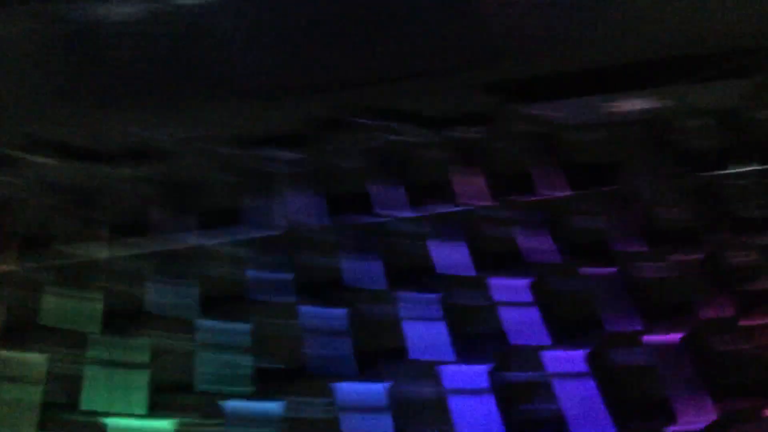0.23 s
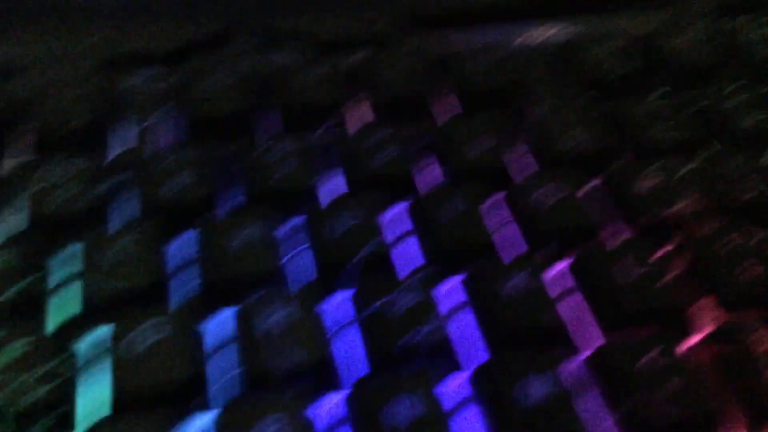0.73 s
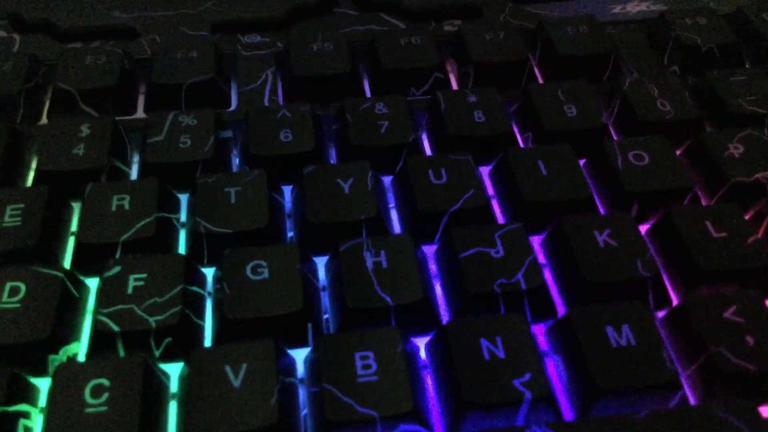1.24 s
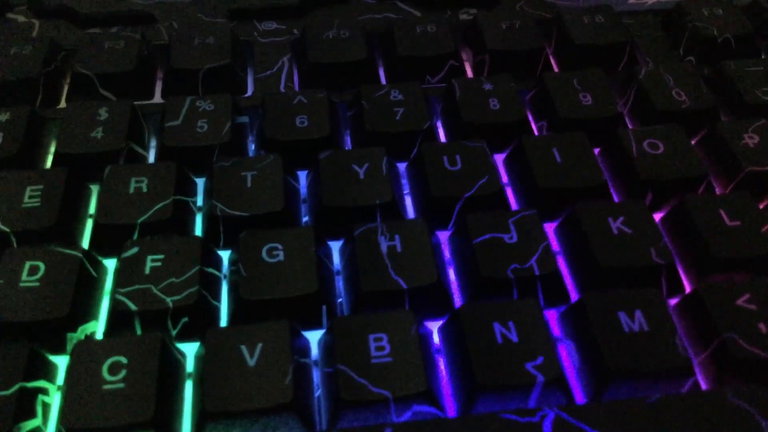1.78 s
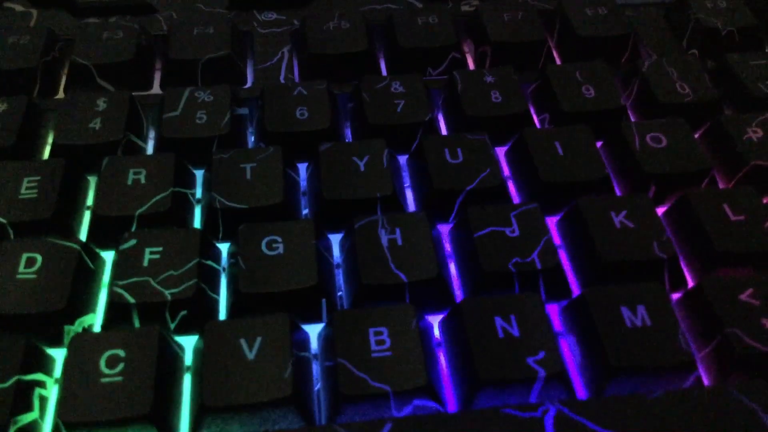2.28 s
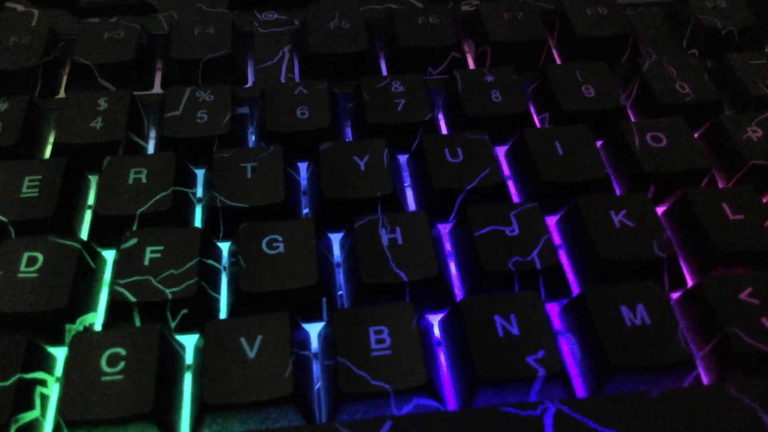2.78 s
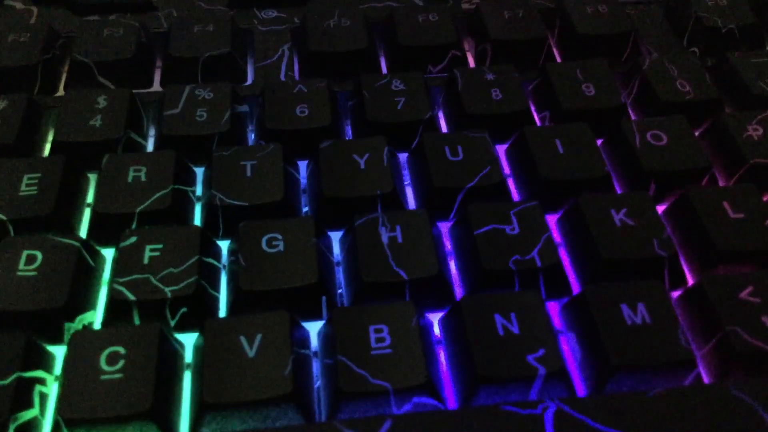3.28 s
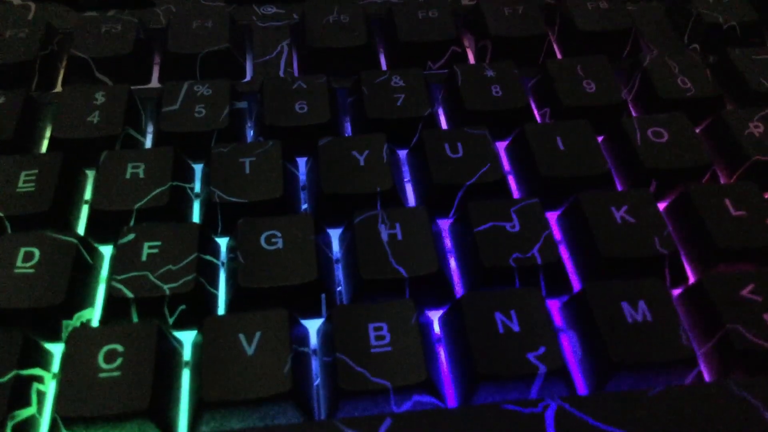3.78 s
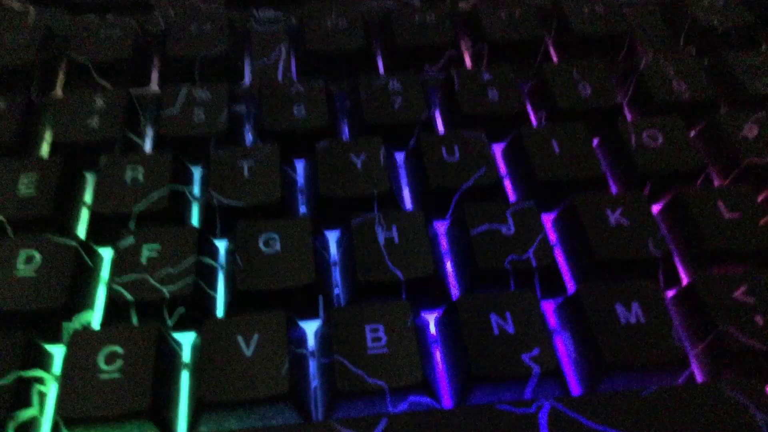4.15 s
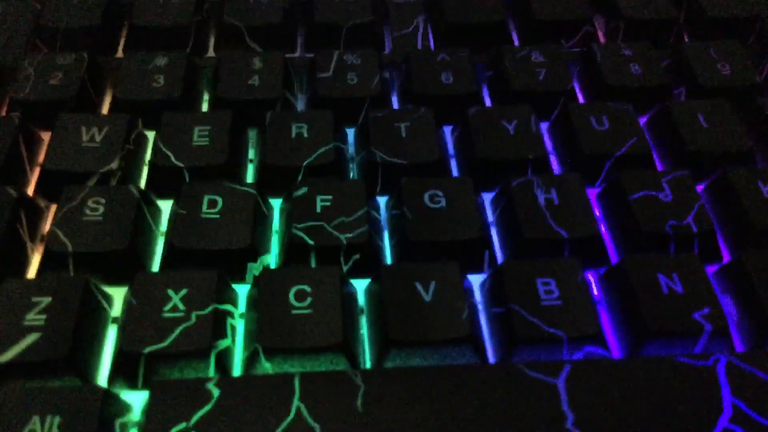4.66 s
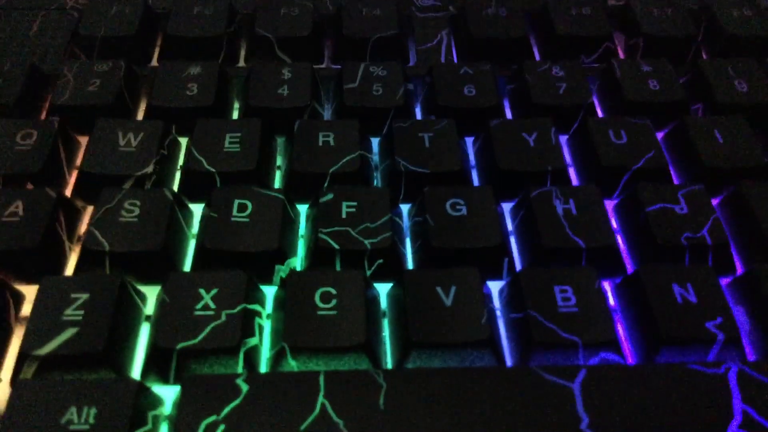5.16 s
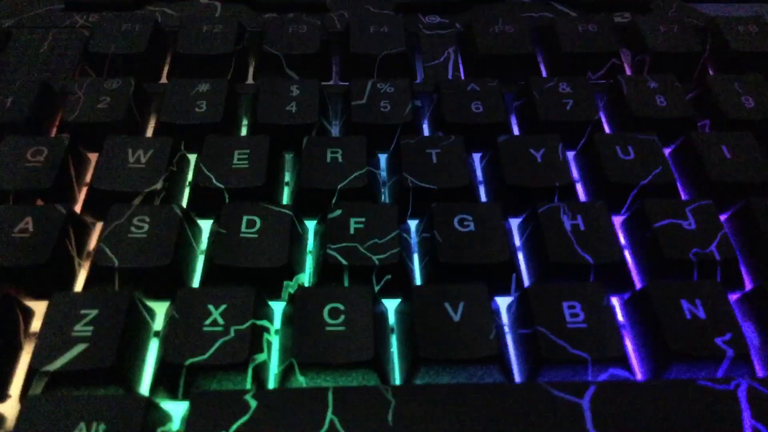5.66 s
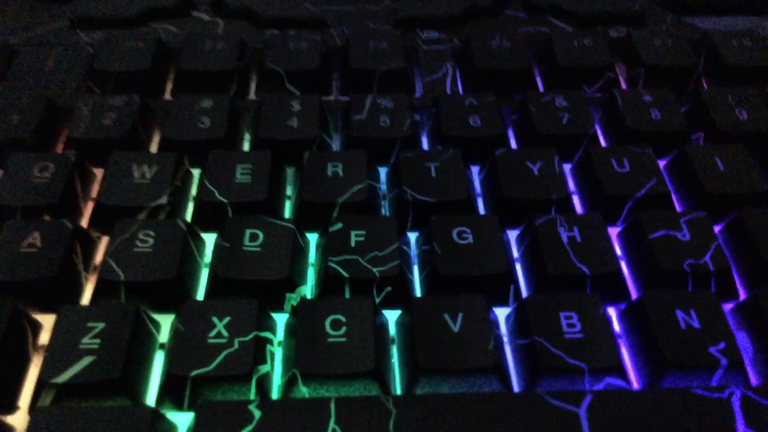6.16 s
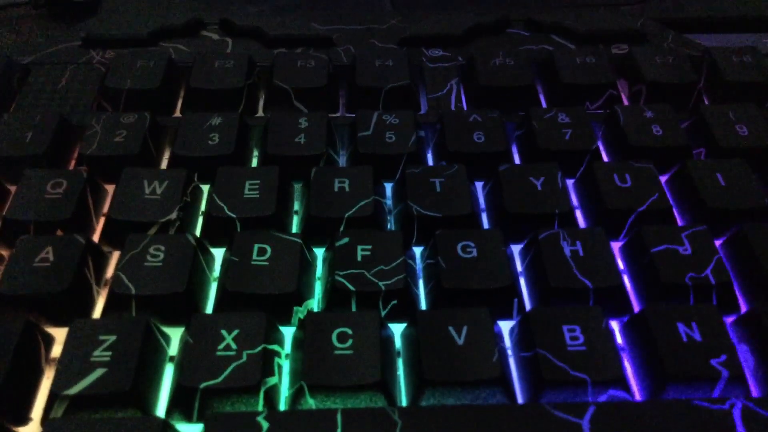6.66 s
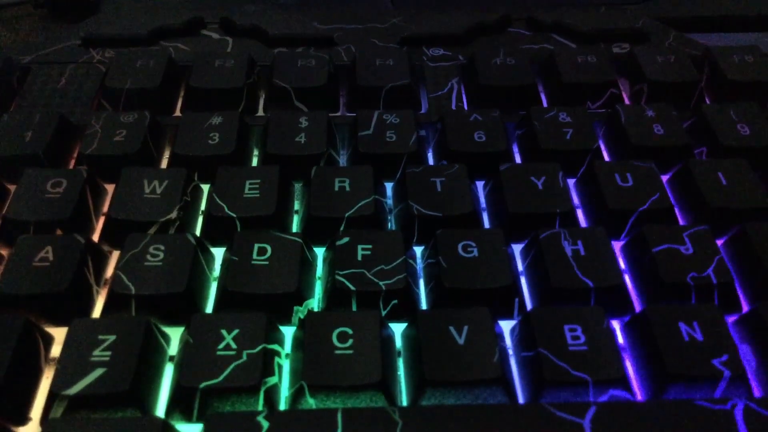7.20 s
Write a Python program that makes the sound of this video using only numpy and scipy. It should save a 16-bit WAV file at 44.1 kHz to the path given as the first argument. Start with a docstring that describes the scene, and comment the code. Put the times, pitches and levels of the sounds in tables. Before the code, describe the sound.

A close, dry pickup in a small quiet room: soft low air noise with a faint fan hum that fades during the first seconds. From 0.2 to 0.95 s the hand-held microphone rustles and creaks, with one bright click near 0.84 s. Quiet follows, with a tiny tick at 2.0 s. At 2.29 s a finger strikes a plastic key hard, the loudest sound, and repeats about six times a second until 4.2 s: firm clack down, lighter click up, a low desk thump and short hollow boom underneath. The strokes stay strong until about 3.4 s, then soften greatly. Around 4.25 to 4.8 s skin rustles and loose caps clatter as the hand moves; the hum returns. After a pause, a second key is tapped from 5.7 s to the end at 7.4 s, the first stroke clearest, the rest faint, thin and rattly, with little ticks between.

```python
"""A finger taps one key of a plastic computer keyboard six times a second, easing off, pauses, then taps a second key
lightly. Each stroke is a pair of shaped impacts, down and up, that excite resonant modes; each also sends a swelling
low wave through the desk and a short boom through the case. Clumpy noise makes the skin's rustle and the hand's swish,
and further impacts make caps tick, brushed keycaps clatter and the hand-held microphone creak.
A small room adds a faint tail, air noise of slowly changing level and a fan's hum that fades and returns."""
import sys
import numpy as np
from scipy import signal
from scipy.fft import rfft, irfft, next_fast_len
from scipy.io import wavfile
from scipy.ndimage import map_coordinates

SR = 44100
rng = np.random.default_rng(int(sys.argv[2]) if len(sys.argv) > 2 else 0)


def pcm_store(signal):
    """Save signal as 16-bit PCM."""
    levels = np.round(np.clip(np.atleast_2d(signal), -1, 1) * 32767)
    wavfile.write(sys.argv[1], SR, levels.astype(np.int16).T)


N = 327663

# strength of an ordinary contact, in dB
USUAL_DB = -40
# the finger has moved to the second key by then
SECOND_KEY_S = 5


def amp(db):
    """Decibel law: a level in dB becomes a linear gain."""
    return 10 ** (np.asarray(db) / 20)


def unit(x):
    """Normalization: scale a signal to rms 1."""
    return x / np.sqrt(np.mean(x ** 2) + 1e-20)


def along(points, hz):
    """Logarithmic pitch scale: interpolate (frequency_hz, value) points along it."""
    f, v = np.transpose(points)
    return np.interp(np.log(hz + 1), np.log(f + 1), v)


def curve(rows):
    """Linear interpolation: (time_s, value) rows become one value per sample."""
    return np.interp(np.arange(N) / SR, *np.transpose(rows))


def add(track, s, x):
    """Superposition: mix x into the track from time s on."""
    start = max(round(s * SR), 0)
    part = track[start:start + len(x)]
    part += x[:len(part)]


def filtered(x, response):
    """Linear filtering: multiply the spectrum of x by a response of frequency."""
    m = next_fast_len(N + SR // 2)
    return irfft(rfft(x, m) * response(np.fft.rfftfreq(m, 1 / SR)), m)[:N]


def noise(response):
    """Spectral shaping: white noise is coloured by a response and scaled to rms 1."""
    return unit(filtered(rng.standard_normal(N), response))


def resonances(modes, hz):
    """Modal superposition: sum the steep-sided gains of (centre_hz, width_hz, level_db) modes."""
    return sum(amp(level_db) * (hz * width) ** 2 / ((centre ** 2 - hz ** 2) ** 2 + (hz * width) ** 2)
               for centre, width, level_db in modes)


def gritty(size, grain_s=.0012):
    """Stick-slip friction: noise comes in tiny clumps, as one surface catches on another."""
    clumps = map_coordinates(rng.standard_normal(size), [np.arange(size) / (SR * grain_s)], order=1)
    return rng.standard_normal(size) * amp(5 * clumps)


# spectrum of the room air: frequency_hz, density_db (per Hz)
AIR_SPECTRUM = [(25, -9.5), (70, -5.5), (110, -7), (170, -3), (230, -12), (295, -10), (360, -11.5),
                (575, -12.5), (950, -20), (2100, -26.5), (3600, -39.5), (7000, -46.5), (13600, -50.5),
                (16000, -59.5)]
# level of the room air: time_s, level_db
AIR_LEVEL = [(0, -54.5), (1.2, -56.5), (2.3, -55), (2.85, -52), (3.85, -52), (4.6, -56.5), (7.43, -57.5)]
# modes of the fan hum: centre_hz, width_hz, level_db
HUM_MODES = [(234.4, 32, -4), (373, 47, -12.5)]
# level of the fan hum where the microphone is held: time_s, level_db
HUM_LEVEL = [(0, -55.5), (1, -64), (2, -64), (2.5, -72), (4.5, -73), (4.8, -58), (7.43, -55.5)]


def background(low_hz=60):
    """Noise with slowly changing level: broadband air, thinned in the bass, and a hum that fades and returns."""
    air = noise(lambda hz: amp(along(AIR_SPECTRUM, hz)) * hz ** 2 / np.hypot(hz ** 2, low_hz ** 2))
    hum = noise(lambda hz: resonances(HUM_MODES, hz))
    return amp(curve(AIR_LEVEL)) * air + amp(curve(HUM_LEVEL)) * hum


# keystrokes: down_s, press_db, press_weight_db, crest_lag_s (until the push crests in the desk),
# up_s, release_db, release_weight_db
STROKES = [(2.286, -13.4, 2, .026, 2.3576, -42.5, 1), (2.4638, -30, 1, .026, 2.5333, -31.5, 0),
           (2.6447, -22, -1, .024, 2.7104, -28, -2), (2.8153, -19.5, -1, .023, 2.8793, -33, 0),
           (2.9799, -16.5, -2, .023, 3.0477, -32, 0), (3.147, -20.5, -2, .024, 3.214, -34.5, 3),
           (3.3135, -24.5, 0, .025, 3.3784, -30.5, 2), (3.472, -35.5, 3, .028, 3.5448, -39.5, 0),
           (3.644, -37, 2, .025, 3.7134, -41, 2), (3.8047, -45, 3, .029, 3.8758, -40.5, 1),
           (3.9721, -46.5, -4, .033, 4.0457, -46.5, 0), (4.1283, -46, -4, .032, 4.2184, -45.5, 0),
           (5.7056, -31, 0, .03, 5.7975, -35, -7), (5.8682, -44.5, -2, .054, 5.9572, -37.5, 5),
           (6.0372, -43, -1, .034, 6.129, -43.5, 5), (6.1922, -50, 2, .05, 6.2907, -40, 7),
           (6.3635, -52, 1, .04, 6.4556, -52, 3), (6.533, -51.5, 0, .042, 6.623, -38, 0),
           (6.7021, -48, 0, .031, 6.7943, -48.5, 2), (6.877, -47.5, -1, .04, 6.9849, -46, -10),
           (7.062, -52, 4, .031, 7.141, -57, 1), (7.2016, -48, -1, .04, 7.3022, -52, 0),
           (7.381, -52.5, 5, .042, 7.47, -52, 0)]


def strokes_on(key):
    """Event selection: the strokes on the first (0) or the second (1) key."""
    return [row for row in STROKES if (row[0] > SECOND_KEY_S) == key]


def presses(key):
    """Downward impacts of a key: start_s, strength_db, weight_db."""
    return [(down, db, weight) for down, db, weight, *_ in strokes_on(key)]


def releases(key):
    """Upward impacts of a key: start_s, strength_db, weight_db."""
    return [(up, db, weight) for *_, up, db, weight in strokes_on(key)]


def held(start, end, attack_s=.025, release_s=.035):
    """Exponential envelope of a hand movement: it swells, holds and fades."""
    t = np.arange(N) / SR
    return np.exp(np.minimum(t - start, 0) / attack_s - np.maximum(t - end, 0) / release_s)


# the hand shifts its place: start_s, length_s, rustle_db, swish_db
MOVES = [(0, .03, -67, -85), (.33, .05, -58, -72), (.8, .09, -60, -71), (1.48, .1, -82, -81.5),
         (4.34, .08, -64, -69.5), (4.45, .07, -54, -68)]
# the fingertip rubs throughout a run, a row for each key: rustle_db, swish_db
RUBBING = [(-65.5, -92), (-64.5, -85)]


def rubbing_gains():
    """Power summation: gains of rustle and swish from the hand's moves and the two runs of taps."""
    runs = [(presses(key)[0][0], releases(key)[-1][0], dbs) for key, dbs in enumerate(RUBBING)]
    moves = [(s, s + length, dbs) for s, length, *dbs in MOVES]
    powers = [np.outer(amp(dbs), held(start, end)) ** 2 for start, end, dbs in runs + moves]
    return np.sqrt(sum(powers))


# spectrum of the skin's rustle: frequency_hz, density_db (per Hz)
SKIN_SPECTRUM = [(200, -40.5), (800, 5), (2500, 0.5), (5000, -7.5), (8000, -17), (13000, -18.5),
                 (16000, -23)]


def rustle():
    """Friction noise: rubbing skin catches and slips in grains of a few milliseconds."""
    skin = unit(filtered(gritty(N, grain_s=.007), lambda hz: amp(along(SKIN_SPECTRUM, hz))))
    return rubbing_gains()[0] * skin


# spectrum of the airy swish: frequency_hz, density_db (per Hz)
AIRY_SPECTRUM = [(2000, -28.5), (5000, -9.5), (9000, -3.5), (13000, 2.5), (16000, -1)]


def swish():
    """Amplitude-modulated noise: the moving hand adds a thin, uneven hiss."""
    catches = map_coordinates(rng.standard_normal(N), [np.arange(N) * 150 / SR], order=1)
    hiss = noise(lambda hz: amp(along(AIRY_SPECTRUM, hz)))
    return rubbing_gains()[1] * unit(hiss * amp(3 * catches))


# reverberation time of the small room: frequency_hz, t60_s
ROOM_T60 = [(150, 0.75), (1000, 0.61), (4000, .25), (14000, 0.29)]


def room(x, wet_db):
    """Reverberation: x is followed by a fresh noise tail that decays at its own rate in each band."""
    hz, t, z = signal.stft(rng.standard_normal(SR // 3), SR, nperseg=256)
    tail = signal.istft(z * amp(-60 * t / along(ROOM_T60, hz)[:, None]), SR, nperseg=256)[1]
    answer = amp(wet_db) * tail / np.linalg.norm(tail)
    # the direct sound
    answer[0] += 1
    return signal.fftconvolve(x, answer)


def causal(gain):
    """Minimum phase: the response with this gain that rings only after the blow."""
    cepstrum = irfft(np.log(np.maximum(gain, gain.max() * 1e-3)))
    half = len(cepstrum) // 2
    return np.exp(rfft(cepstrum * np.r_[1, np.full(half - 1, 2), 1, np.zeros(half - 1)]))


# the four bands of a contact, knock, body, clack and tick: low_hz, high_hz
BANDS = [(170, 550), (550, 1600), (1600, 5000), (5000, 16000)]


def contact(modes, levels, chatter_db, chatter_t60, spread_db, lead_in_db, lead_in_s=0.004, lag_cycles=1.2,
            detune=0.011, bounce_s=0.0014, bounce_db=-1, lead_in_hz=4400, size=4096):
    """Impact excitation of modes: a short hiss swells before the hit, then come bounces and chatter."""
    # the hit falls a quarter of the way in
    t, hz = (np.arange(size) - size // 4) / SR, np.fft.rfftfreq(size, 1 / SR)
    chatter = unit(gritty(size) * (t > 0) * amp(-60 * abs(t) / chatter_t60))
    lead_in = unit(gritty(size) * (t < 0) * np.exp(-abs(t) / lead_in_s))
    bounces = unit(rng.standard_normal(size) * (t > 0) * np.exp(-abs(t) / bounce_s))
    blow = unit(1. * (t == 0))
    force = rfft(blow + amp(bounce_db) * bounces + amp(chatter_db) * chatter)
    # the lead-in fills a broad band
    lead_in_gain = np.sqrt(resonances([(lead_in_hz, lead_in_hz, 0)], hz))
    force = force + amp(lead_in_db) * rfft(lead_in) * lead_in_gain
    # each blow lands on a new spot, which shifts the modes and their strengths
    struck = [(centre * (1 + detune * rng.normal()), width, db + spread_db * rng.normal())
              for centre, width, db in modes]
    gain = resonances(struck, hz)
    # two passes bring the bands close to the asked levels, as power averaged over 10 ms
    band_centres = np.sqrt(np.prod(BANDS, axis=1))
    for _ in range(2):
        energy = abs(force * gain) ** 2
        power = [2 * np.sum(energy[(hz > lo) & (hz < hi)]) / size / (SR * .01) for lo, hi in BANDS]
        correction_db = levels - 10 * np.log10(power)
        gain = gain * amp(along(np.c_[band_centres, correction_db], hz))
    # bending waves are slower at low pitch, so the knock trails the click
    dispersion = np.exp(-2j * np.pi * lag_cycles * np.log1p(hz / 100))
    return irfft(force * causal(gain) * dispersion, size)


# a heavy contact is deeper and duller, one value for each band: gain_db per dB of weight
WEIGHT_SHARE = [1, .6, 0, -.25]


def contacts(rows, modes, colour, chatter_db, chatter_t60, lead_in_db):
    """Level-dependent timbre: strength and weight colour each impact on a part; a room tail follows.

    A colour has two rows over the bands: offset_db for a usual blow, growth_db per dB of extra strength."""
    track = np.zeros(N)
    offset, growth = np.array(colour)
    for s, db, weight in rows:
        levels = USUAL_DB + offset + growth * (db - USUAL_DB) + weight * np.array(WEIGHT_SHARE)
        hit = contact(modes, levels, chatter_db, chatter_t60, spread_db=1.6, lead_in_db=lead_in_db)
        # so close to the keys the room answers faintly
        add(track, s - len(hit) // 4 / SR, room(hit, wet_db=-25))
    return track


# the microphone's housing creaks in the hand: start_s, strength_db, weight_db
GRIP = [(0.2099, -35.5, 7), (0.226, -46.5, 8), (0.3652, -55, 22), (0.8174, -53, 22), (0.8389, -27.3, -15),
        (0.8616, -49, 8), (0.884, -40, -3), (0.9498, -48.5, 5)]
# modes of the housing: centre_hz, width_hz, level_db
HOUSING = [(234, 84, -11), (367, 250, -15), (583, 100, -11.5), (830, 170, -9), (1250, 510, -14),
           (1706, 220, -7), (2380, 300, -4), (3150, 290, -7), (3670, 770, -13), (4465, 970, -21.5),
           (8460, 1800, -25), (12308, 3150, -28)]
# colour of a creak over the bands, two rows: offset_db, growth_db per dB
CREAK = [(-16, -9, 0, -17.5), (1, 1, 1, .6)]


def grip_creaks():
    """Structure-borne impacts: the housing's modes sound as the hand moves the microphone."""
    return contacts(GRIP, HOUSING, CREAK, chatter_db=-5.5, chatter_t60=0.039, lead_in_db=-6)


# how the desk takes a press, a row for each key: usual_db, growth_db per dB of extra strength, pitch_hz
DESK_PUSH = [(-32.5, .14, 99), (-31.5, .38, 90)]


def pushes(release_db=-42, release_lag_s=.021, pitch_scatter=.04, scatter_db=1):
    """Momentum transfer: every press and release pushes the desk, as crest_s, level_db, pitch_hz."""
    rows = []
    for key, (usual_db, growth, hz) in enumerate(DESK_PUSH):
        for down, db, _, lag, up, _, _ in strokes_on(key):
            rows.append((down + lag, usual_db + growth * (db - USUAL_DB), hz))
            rows.append((up + release_lag_s, release_db, hz))
    return [(s, db + scatter_db * rng.normal(), hz * (1 + pitch_scatter * rng.normal())) for s, db, hz in rows]


# the hand bumps the microphone or the desk: crest_s, level_db, pitch_hz
BUMPS = [(0.219, -44, 105), (0.264, -47, 80), (4.502, -49, 99)]


def desk(rise_s=0.011, fall_s=0.0098, sag=0.25, sag_s=.016, sway_hz=48, sway_db=-14, sway_s=.016):
    """Bending waves: each push or bump gives a few low cycles that swell, sink in pitch and die."""
    track, t = np.zeros(N), np.arange(-SR // 15, SR // 8) / SR
    swell = np.where(t < 0, np.exp(-.5 * (t / rise_s) ** 2), np.exp(1 - np.hypot(1, t / fall_s)))
    # the whole desk sways slowly underneath
    sway = amp(sway_db) * np.exp(-.5 * (t / sway_s) ** 2) * np.sin(2 * np.pi * sway_hz * t)
    for s, db, hz in pushes() + BUMPS:
        cycles = np.cumsum(hz * (1 - sag * np.tanh(t / sag_s))) / SR
        wave = swell * np.sin(2 * np.pi * (cycles + rng.random()))
        add(track, s + t[0], amp(db) * (wave + sway))
    return track


# a cap shifts on its stem under the fingertip: start_s, strength_db, weight_db
CAP_TICKS = [(2.0122, -55.5, 6), (2.8398, -45, 4), (4.256, -55, 2), (4.283, -42.5, -5), (4.3039, -51, 2),
             (5.7358, -47, 0), (5.7794, -45, -3), (5.8045, -38.5, -12), (5.8963, -53.5, 12),
             (6.2143, -46.5, 8), (6.3064, -49, -8), (6.3824, -51.5, 12), (6.4278, -53, 4), (6.443, -51, 3),
             (6.4722, -51, -4), (6.4891, -45, 9), (6.8084, -48, -12), (6.9734, -46.5, 0), (7.225, -57, 22),
             (7.3174, -55, 8)]
# modes of the second key's cap, thinner and brighter: centre_hz, width_hz, level_db
THIN_CAP = [(206, 120, -1), (387, 18, -14.5), (550, 88, -17.5), (720, 130, -11.5), (850, 100, -11),
            (1343, 276, -10), (1643, 190, -10), (1983, 200, -9.5), (2400, 280, -5), (3010, 595, -12.5),
            (3770, 738, -16.5), (4870, 1000, -21), (5440, 130, -19), (6624, 670, -17), (7392, 530, -28),
            (8070, 372, -24), (9130, 724, -23), (11200, 2000, -36.5), (13400, 3300, -34)]
# colour of a tick over the bands, two rows: offset_db, growth_db per dB
TICK = [(-9, -7, 0, -6), (1, 1, 1, 1)]


def cap_ticks():
    """Small impacts in the clearance of a joint: a cap shifts on its stem and rings its thin modes."""
    return contacts(CAP_TICKS, THIN_CAP, TICK, chatter_db=-0.5, chatter_t60=.035, lead_in_db=-0.5)


# modes of the base plate under the first key: centre_hz, width_hz, level_db
PLATE = [(166.6, 68, 2.5), (355, 76, -0.5), (580, 130, -7.5), (810, 90, -11.5), (953, 130, -10.5),
         (1247, 160, -13.5), (1470, 100, -4), (2140, 330, -5.5), (2455, 330, -11), (2877, 43, -19.5),
         (3364, 352, -9.5), (3960, 110, -11.5), (4400, 140, -9.5), (4750, 169, -21), (6045, 965, -20),
         (6883, 308, -27), (8217, 1366, -37), (9200, 502, -31), (10652, 1424, -30.5), (13400, 3475, -33)]
# modes of the first key's cap against its upper stop: centre_hz, width_hz, level_db
CAP = [(175, 95, -1), (375, 73, -0.5), (567, 160, -13), (944, 180, -9), (1239, 180, -2.5),
       (1580, 280, -12.5), (2010, 780, -0.5), (2320, 166, -14), (2901, 80, -14.5), (3325, 900, -3),
       (4200, 1000, -16), (4854, 531, -28), (6009, 325, -13.5), (7013, 1132, -26), (9100, 500, -16.5),
       (10550, 690, -24), (13105, 2739, -24)]
# colour of the press and of the release over the bands, two rows each: offset_db, growth_db per dB
FIRM_PRESS = [(0, 1.3, 0, -12.5), (.49, .66, 1, .9)]
FIRM_RELEASE = [(-5.5, 3.5, 0, -6.5), (.85, .6, 1, .95)]


def first_key():
    """Impact on a plate: strokes bottom out on its modes; the cap springs back against its stop."""
    down = contacts(presses(0), PLATE, FIRM_PRESS, chatter_db=-5, chatter_t60=0.034, lead_in_db=-0.5)
    up = contacts(releases(0), CAP, FIRM_RELEASE, chatter_db=-1, chatter_t60=0.032, lead_in_db=-1)
    return down + up


# modes of the hollow case: centre_hz, width_hz, level_db
CASE = [(160, 45, 0), (235, 50, -5)]


def boom(level_db=-46, attack_s=.006, decay_s=.035):
    """Cavity resonance: the hollow case rumbles briefly after every press, however light."""
    t, envelope = np.arange(SR // 4) / SR, np.zeros(N)
    for down, *_ in STROKES:
        add(envelope, down, (1 - np.exp(-t / attack_s)) * np.exp(-t / decay_s))
    return amp(level_db) * envelope * noise(lambda hz: resonances(CASE, hz))


# spectrum of the rattle: frequency_hz, gain_db
RATTLE_SPECTRUM = [(300, -21.5), (1200, 3), (2500, 3), (4500, -2), (7000, -7.5), (9500, -2.5),
                   (14000, -10.5), (16000, -8.5)]


def rattle(first_db=-62, second_db=-69, force_share=0.6, scatter_db=3, from_s=0.0055, to_s=0.042,
           life_s=0.0028, count=11):
    """Random micro-impacts: a held key's cap rocks on its stem, louder after a hard stroke."""
    track, t = np.zeros(N), np.arange(SR // 100) / SR
    for s, press_db, *_ in STROKES:
        db = (first_db if s < SECOND_KEY_S else second_db) + force_share * (press_db - USUAL_DB)
        for delay in rng.uniform(from_s, to_s, count):
            gain = amp(db + scatter_db * rng.normal())
            tick = unit(rng.standard_normal(len(t)) * np.exp(-t / life_s))
            add(track, s + delay, gain * tick)
    return filtered(track, lambda hz: amp(along(RATTLE_SPECTRUM, hz)))


# the fingernail grazes the cap: start_s, strength_db, weight_db
NAIL_TICKS = [(2.4829, -52, 8), (3.851, -58, 4), (4.429, -58, 4), (6.097, -57, 2), (6.238, -61, 0),
              (6.262, -58, 2), (6.412, -58.5, 0), (6.5796, -54, 4), (6.7454, -55, 6)]
# modes of a fingernail's thin tick: centre_hz, width_hz, level_db
NAIL_MODES = [(3500, 3000, -12), (9200, 1500, -3), (13500, 5000, 0)]
# colour of a nail's tick over the bands, two rows: offset_db, growth_db per dB
NAIL = [(-18, -16, -10, 0), (1, 1, 1, 1)]


def nail_ticks():
    """Hard, light impacts: a fingernail on plastic excites mainly broad treble modes."""
    return contacts(NAIL_TICKS, NAIL_MODES, NAIL, chatter_db=-3, chatter_t60=.03, lead_in_db=-7)


# fingers brush over loose caps: start_s, strength_db, weight_db
BRUSHED = [(4.4456, -42, -4), (4.4781, -42, 2), (4.4964, -46, 6), (4.5041, -43.5, 0), (4.5338, -41, -2),
           (4.5903, -52, 4), (4.6344, -62, 2), (4.8016, -52.5, 0)]
# modes of caps rocking sideways: centre_hz, width_hz, level_db
LOOSE_CAPS = [(230, 180, -17), (605, 180, -5), (770, 180, 8), (1255, 190, -12), (1690, 280, -6),
              (2560, 920, -12), (4240, 1072, -18.5), (5500, 111, -24), (7150, 1517, -26.5),
              (8882, 580, -21), (12150, 3100, -35.5)]
# colour of a brushed cap over the bands, two rows: offset_db, growth_db per dB
BRUSH = [(-20, -1, 0, -14), (1, 1, 1, 1)]


def brushed_caps():
    """Rocking modes: fingers brushing over loose caps knock them sideways."""
    return contacts(BRUSHED, LOOSE_CAPS, BRUSH, chatter_db=-2.5, chatter_t60=0.024, lead_in_db=-4)


# colour of the press and of the release over the bands, two rows each: offset_db, growth_db per dB
LIGHT_PRESS = [(-1, 1.5, 0, -4.5), (1.25, 1.25, 1, 1)]
LIGHT_RELEASE = [(-9.5, -4.5, 0, -4.5), (.3, .55, 1, .85)]


def second_key():
    """Impacts with loose clearance: light strokes on a thinner key, with stronger chatter."""
    down = contacts(presses(1), THIN_CAP, LIGHT_PRESS, chatter_db=0, chatter_t60=0.03, lead_in_db=0)
    up = contacts(releases(1), THIN_CAP, LIGHT_RELEASE, chatter_db=1.5, chatter_t60=0.034, lead_in_db=2)
    return down + up


def loose_ticks(strength_db=-61, scatter_db=2.5, weight_db=3, weight_scatter_db=6, from_s=.015, to_s=.08, count=2):
    """Random impacts: the looser second key ticks faintly soon after each press."""
    rows = []
    for down, _, _ in presses(1):
        for delay in rng.uniform(from_s, to_s, count):
            strength = strength_db + scatter_db * rng.normal()
            rows.append((down + delay, strength, weight_db + weight_scatter_db * rng.normal()))
    return contacts(rows, THIN_CAP, TICK, chatter_db=-3, chatter_t60=.025, lead_in_db=-5)


def scene():
    """Superposition: all sources add at the one microphone."""
    hand = rustle() + swish() + grip_creaks() + cap_ticks() + nail_ticks() + brushed_caps()
    keys = first_key() + second_key() + rattle() + loose_ticks()
    return (background() + hand + desk() + keys + boom())[None]


def record(dry, top_hz=16000):
    """Band limitation: a steep low-pass removes everything above the top frequency."""
    return filtered(dry[0], lambda hz: np.clip((top_hz - hz) / 400 + .5, 0, 1))[None]


dry = scene()
out = record(dry)
pcm_store(out)
```